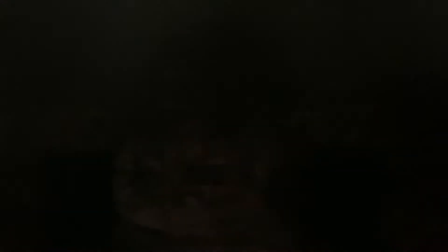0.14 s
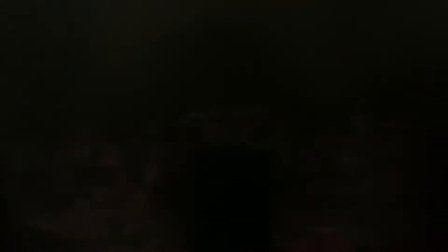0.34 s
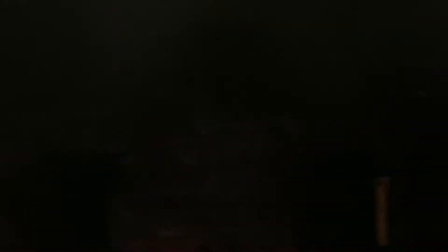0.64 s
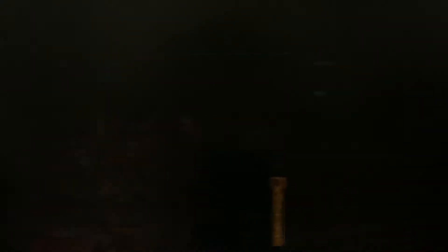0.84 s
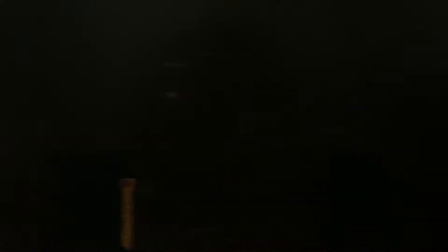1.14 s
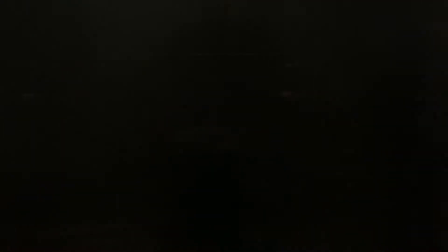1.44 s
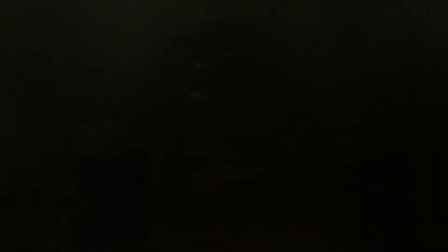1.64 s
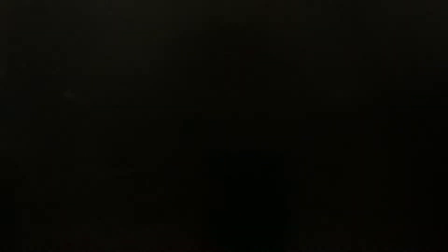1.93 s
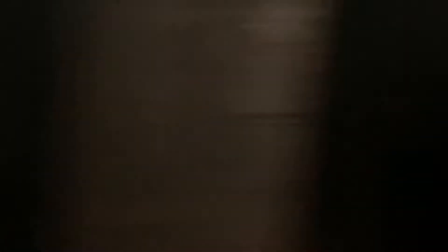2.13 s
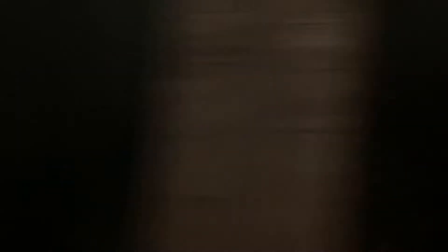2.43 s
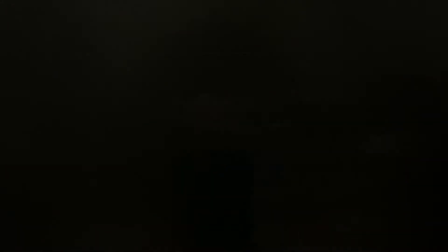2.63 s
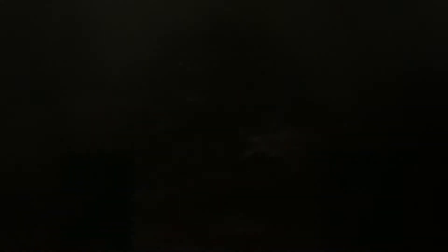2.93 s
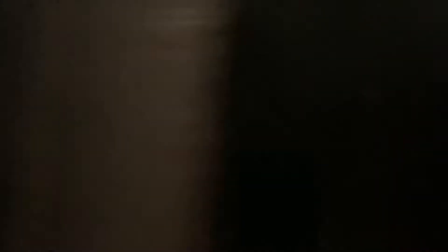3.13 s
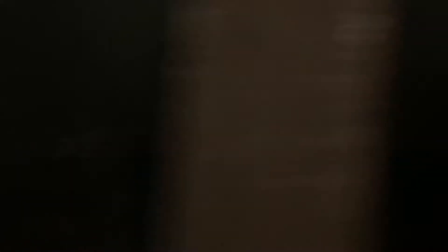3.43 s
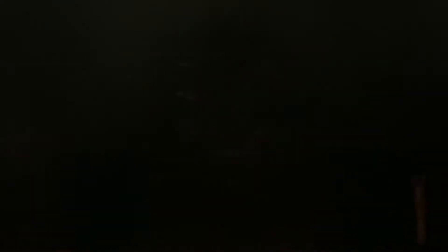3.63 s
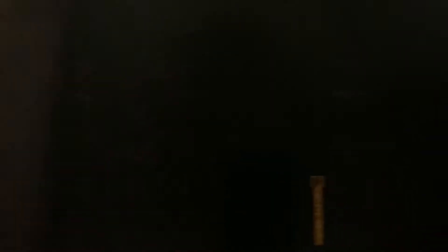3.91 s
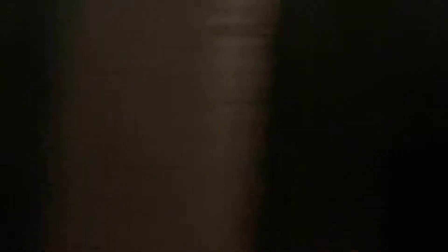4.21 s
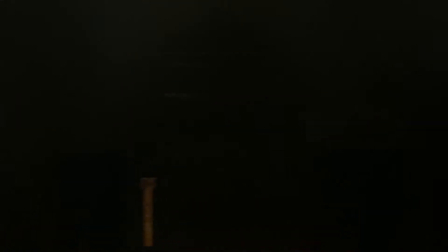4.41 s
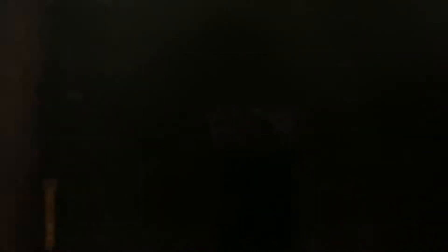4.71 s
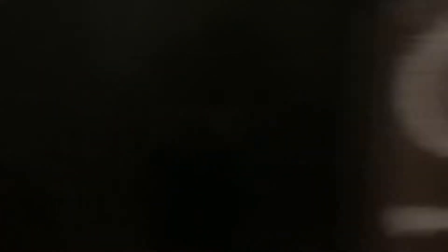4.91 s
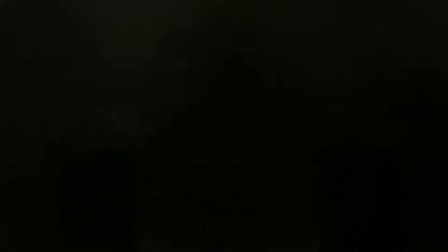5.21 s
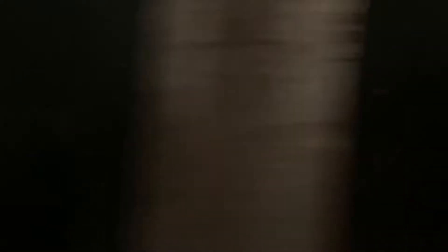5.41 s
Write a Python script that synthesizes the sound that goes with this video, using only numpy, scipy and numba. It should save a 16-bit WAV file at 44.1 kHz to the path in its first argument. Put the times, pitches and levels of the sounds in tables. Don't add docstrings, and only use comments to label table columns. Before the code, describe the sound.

Inside a subway car running fast through a tunnel, heavy wheel-and-rail roar fills the whole take, strongest in the lows, with irregular soft jolts and ringing body resonances. A thin metallic squeal near 2.7 kilohertz wavers in and out, mixed with fluttering air whistles. Panels hum low now and then. Near the end come a tiny tick and barely audible very high chirps. Close stereo pickup, wide, dense, with a short tunnel reverberation.

```python
import sys
import numpy as np
from scipy import signal
from scipy.fft import rfft, irfft
from scipy.io import wavfile
from scipy.ndimage import uniform_filter1d
from numba import njit

SR = 44100
rng = np.random.default_rng(int(sys.argv[2]) if len(sys.argv) > 2 else 0)


def put_to_file(sound):
    columns = np.atleast_2d(sound).T
    safe = np.clip(columns, -1, 1)
    whole_steps = np.round(safe * 32767)
    wavfile.write(sys.argv[1], SR, whole_steps.astype(np.int16))


def ratio_of_db(decibels):
    return 10 ** (np.asarray(decibels, float) / 20)


N = 244868
TIME = np.arange(N) / SR
FREQ = np.arange(N // 2 + 1) * SR / N + 1e-3

# [f/Hz, density/dB per Hz]
ROAR_MID = [(12, -46.5), (20, -17), (93, 0), (178, -4), (235, -1.5), (287, -6.5), (474, -5.5), (524, -11.5),
            (1330, -19.5), (2370, -20.5), (2820, -20), (3120, -24), (3630, -27), (8000, -55), (8500, -77),
            (10500, -108.5), (17800, -120)]
ROAR_SIDE = [(12, -48), (20, -26.5), (218, -7), (408, -4), (474, -4.5), (691, -9.5), (1030, -9),
             (1330, -14), (1470, -11), (2370, -15), (2820, -11), (4220, -28.5), (5560, -33.5), (8100, -53),
             (10500, -77.5), (17800, -120)]
ROAR_MID_DB, ROAR_SIDE_DB = -19.5, -25.5
# [f/Hz, left minus right level/dB]
LEFT_RIGHT_BALANCE = [(60, -2.5), (100, -1), (180, -0.5), (300, 0.5), (520, 1), (890, -0.5), (1520, 0.5),
                      (2600, 2.5), (4460, -0.5), (7650, -4.5)]
# [f/Hz, width/Hz, level over roar/dB]
BODY_RESONANCES = [(57.3, 7.9, 7.5), (72, 7.4, -7.5), (91, 7.1, 8), (114, 17, 5.5), (147.3, 13, 8),
                   (230, 13, 8), (252.8, 6.8, 8), (202.7, 15, 5), (338.2, 10, 8), (351, 9.9, 2),
                   (293, 23, 4.5), (439, 6.5, 5.5), (401.5, 8.5, 6), (486.6, 17, 7), (572, 37, 8.5),
                   (668, 23, 6), (921, 14, 7), (1460, 13, 7), (1160, 28, 4.5), (1710, 22, 3),
                   (1819, 31, 5.5), (2165, 20, 2), (2233, 13, 10), (2570, 32, 5.5)]
# [f/Hz, share]
PORT_LEAD = [(50, .6), (100, .35), (250, .33), (480, .27), (640, 0), (1050, -.17), (1500, -.22), (2100, 0),
             (3500, .15), (4500, 0)]

# [t/s, level/dB]
TRACK_ROUGHNESS = [(0, 3.5), (.5, 1.5), (1.2, 2), (1.8, 0.5), (2.2, 1.5), (2.7, 1), (3.2, 0.5), (4.0, 1.5),
                   (4.4, 2), (4.9, 1), (5.3, 1.5), (5.55, -1.5)]
SHAKE_EDGES_HZ = [80, 125, 190, 290, 430, 750, 1050]
# [share of track level, own sway level/dB]
SHAKE_FOLLOW = [(.5, 0.5), (.5, 0.5), (.5, 3), (.5, 1.5), (.5, 1.8), (.5, 1.26), (.3, 1)]
SHAKE_SWAYS_PER_S, WALL_SHARE, WALL_SWAY_DB = 14, 0.22, 0.77
KNOCK_DB, KNOCKS_PER_S, PATCHY_DB = 0.5, 8.1, 1
# [t/s, f/Hz, level/dB,
# length/s]
JOLTS = [(0.19, 100.0, 3, 0.03), (0.36, 50.0, 2, 0.078), (0.39, 100.0, 4.5, 0.04),
         (0.71, 50.0, 5.5, 0.064), (0.77, 50.0, -8, 0.03), (0.77, 100.0, 1.5, 0.057),
         (0.83, 50.0, 3.5, 0.04), (0.88, 100.0, -4, 0.018), (1.03, 50.0, 3.5, 0.1),
         (1.15, 100.0, 1, 0.06), (1.21, 50.0, -1.5, 0.03), (1.28, 50.0, 3, 0.11),
         (1.32, 100.0, 5, 0.027), (1.5, 50.0, -6, 0.029), (1.69, 50.0, -6.5, 0.024),
         (1.81, 50.0, -1.5, 0.056), (1.86, 100.0, -5.5, 0.048), (2.0, 100.0, -12.5, 0.05),
         (2.12, 50.0, 3, 0.11), (2.22, 50.0, 3.5, 0.03), (2.25, 100.0, -4.5, 0.033),
         (2.35, 100.0, 4, 0.12), (2.38, 50.0, 6, 0.04), (2.51, 100.0, -5.5, 0.036),
         (2.62, 50.0, -5, 0.018), (2.73, 50.0, -6.5, 0.04), (2.83, 100.0, -5.5, 0.024),
         (3.23, 100.0, -10.5, 0.064), (3.33, 50.0, -9.5, 0.08), (3.51, 100.0, -2.5, 0.05),
         (3.62, 100.0, 0.5, 0.023), (3.67, 50.0, -3.5, 0.036), (3.8, 100.0, -4, 0.025),
         (3.9, 50.0, -7.5, 0.027), (3.9, 100.0, -6.5, 0.04), (4.28, 100.0, 6.5, 0.029),
         (4.34, 100.0, -8, 0.045), (4.66, 100.0, 1.5, 0.09), (4.85, 100.0, 10, 0.029),
         (4.94, 50.0, -6, 0.037), (4.96, 100.0, -9.5, 0.13), (5.0, 50.0, 4, 0.044),
         (5.27, 50.0, -10.5, 0.027), (5.38, 100.0, 5, 0.093), (5.44, 50.0, -12, 0.04),
         (0.097, 150, -8, 0.082), (0.591, 150, 1, 0.03), (0.732, 150, 1, 0.093),
               (0.997, 150, 2, 0.12), (1.288, 150, -5, 0.065), (1.34, 150, 1.5, 0.052),
               (1.486, 150, -4, 0.033), (1.789, 150, -4.5, 0.05), (2.011, 150, -4, 0.036),
               (2.25, 150, 3, 0.04), (2.39, 150, -3.5, 0.12), (2.709, 150, -3, 0.033),
               (3.018, 150, -2.5, 0.046), (3.1, 150, -7.5, 0.04), (3.25, 150, 3, 0.088),
               (3.556, 150, 0, 0.033), (3.699, 150, -9, 0.031), (4.17, 150, -10, 0.036),
               (4.381, 150, 6.5, 0.03), (4.739, 150, -0.5, 0.022), (4.832, 150, -0.5, 0.079),
               (4.972, 150, 4.5, 0.067), (5.182, 150, 8.5, 0.029), (5.293, 150, 3, 0.02),
               (5.434, 150, -2.5, 0.02),
         (0.056, 230.0, 3.5, 0.03), (0.217, 230.0, -4, 0.03), (0.26, 230.0, 2.5, 0.07),
               (0.523, 230.0, 6.5, 0.024), (0.823, 230.0, -2.5, 0.058), (0.91, 230.0, 4, 0.054),
               (1.072, 230.0, -3.5, 0.092), (1.17, 230.0, 2.5, 0.12), (1.267, 230.0, 0.5, 0.084),
               (1.523, 230.0, 1, 0.036), (1.634, 230.0, 2, 0.02), (1.712, 230.0, 2, 0.03),
               (1.75, 230.0, -0.5, 0.028), (1.9, 230.0, 3, 0.04), (1.963, 230.0, -2.5, 0.04),
               (2.022, 230.0, 5, 0.046), (2.123, 230.0, 2.5, 0.065), (2.278, 230.0, -2.5, 0.05),
               (2.365, 230.0, 3.5, 0.06), (2.43, 230.0, -10, 0.022), (2.634, 230.0, -4, 0.023),
               (2.683, 230.0, 2.5, 0.027), (2.724, 230.0, -9.5, 0.018), (2.886, 230.0, -6.5, 0.018),
               (2.95, 230.0, -3, 0.035), (3.125, 230.0, -4, 0.026), (3.178, 230.0, 3.5, 0.1),
               (3.242, 230.0, -12.5, 0.02), (3.402, 230.0, 2.5, 0.09), (3.453, 230.0, -8, 0.018),
               (3.49, 230.0, 0.5, 0.026), (3.712, 230.0, 6.5, 0.04), (3.758, 230.0, -7, 0.024),
               (4.094, 230.0, -6.5, 0.03), (4.213, 230.0, 3.5, 0.15), (4.362, 230.0, -11, 0.019),
               (4.422, 230.0, 1.5, 0.12), (4.576, 230.0, -4, 0.04), (4.707, 230.0, -4, 0.03),
               (4.859, 230.0, -8.5, 0.026), (4.976, 230.0, -6, 0.02), (5.024, 230.0, 3.5, 0.067),
               (5.129, 230.0, -6, 0.025), (5.227, 230.0, -4, 0.03), (5.424, 230.0, -4.5, 0.045),
         (0.096, 890.0, -9.5, 0.03), (0.254, 890.0, 0, 0.03), (0.366, 350.0, 2, 0.1),
               (0.387, 570.0, 1.5, 0.04), (0.462, 570.0, -4.0, 0.023), (0.518, 890.0, 2, 0.16),
               (0.678, 570.0, 2, 0.063), (0.693, 350.0, 9, 0.03), (0.762, 350.0, -6.5, 0.087),
               (0.868, 350.0, 5, 0.036), (0.98, 890.0, -2, 0.11), (1.203, 890.0, 8.5, 0.018),
               (1.214, 350.0, 3, 0.041), (1.252, 570.0, -2.5, 0.16), (1.317, 890.0, 4.0, 0.033),
               (1.326, 570.0, 5, 0.032), (1.44, 350.0, 5, 0.035), (1.499, 890.0, -0.5, 0.025),
               (1.577, 570.0, 3.0, 0.036), (1.699, 350.0, 4.5, 0.028), (1.739, 890.0, 2, 0.11),
               (1.853, 570.0, 2, 0.11), (2.017, 350.0, -7.5, 0.04), (2.081, 890.0, 4.5, 0.082),
               (2.261, 890.0, 4, 0.028), (2.36, 350.0, 0, 0.032), (2.47, 570.0, 2, 0.05),
               (2.631, 890.0, 0, 0.05), (2.984, 350.0, 2.5, 0.071), (3.275, 350.0, 6.5, 0.036),
               (3.36, 570.0, 1.5, 0.053), (3.612, 890.0, 3, 0.049), (3.904, 890.0, 3, 0.019),
               (3.917, 570.0, 2, 0.15), (4.004, 890.0, 1.5, 0.045), (4.023, 570.0, -3, 0.068),
               (4.22, 890.0, 1.5, 0.024), (4.231, 570.0, 4, 0.021), (4.273, 350.0, -1, 0.07),
               (4.49, 570.0, 3, 0.021), (4.71, 350.0, -2.5, 0.05), (4.844, 890.0, 2, 0.074),
               (4.967, 350.0, -3, 0.033), (5.39, 350.0, 7, 0.03), (5.476, 570.0, 4.5, 0.13)]

# [t/s, slip rate f/Hz, level/dB]
FLANGE_SLIP = [(0, 928, -39), (.3, 920, -39), (.75, 907, -52), (1.2, 915, -42), (1.55, 912, -50),
               (2.1, 914, -39), (2.38, 912, -47), (2.6, 910, -37), (2.95, 901, -45), (3.4, 893, -47),
               (3.8, 882, -37), (3.95, 920, -40), (4.2, 927, -39), (4.45, 930, -50), (4.85, 934, -37),
               (5.05, 935, -38), (5.3, 900, -54), (5.45, 888, -43)]
# [multiple of slip rate, level/dB]
SQUEAL_HARMONICS = [(1, -5), (2, -12), (3, 0), (4, -11), (5, -19), (6, -22), (7, -38), (8, -40), (9, -36),
                    (10, -48)]
WOBBLE_PERCENT = 1.5
BITE_DB, BITE_DB_PER_HZ, BITE_DB_PER_DB = 8, -.17, -.2
SLOW_SLIP_HZ, SOFT_DB = 885, -47
TUNNEL_T60_S, TUNNEL_WET_DB = .2, 2

# [start t/s, end t/s, level/dB]
GUSTS_LOW = [
    (-.2, .35, -42),
    (.35, .75, -34),
    (2.75, 3.3, -39.5),
    (3.3, 3.84, -47.5),
    (3.95, 4.7, -41.5),
    (4.95, 5.3, -50),
    (5.4, 5.7, -36),
]
GUSTS_HIGH = [
    (-.2, .45, -36),
    (.72, .88, -37),
    (.86, 1.55, -35),
    (1.55, 2.37, -37.5),
    (2.41, 2.95, -34.5),
    (3.0, 3.65, -40),
    (3.93, 4.33, -37.5),
    (4.66, 5.15, -41),
]
# [start t/s, length/s, level/dB, centre f/Hz]
PUFFS_LOW = [(0.001, 0.061, -40, 2500), (0.124, 0.061, -37, 2610), (0.26, 0.093, -38.5, 2585),
             (0.373, 0.041, -35, 2600), (0.418, 0.087, -41, 2626), (0.504, 0.033, -37, 2490),
             (0.558, 0.031, -39, 2560), (0.643, 0.05, -37, 2490), (0.744, 0.043, -45, 2570),
             (1.132, 0.069, -38, 2640), (1.237, 0.031, -30.5, 2540), (1.623, 0.023, -42, 2650),
             (1.899, 0.051, -31, 2630), (2.178, 0.055, -36, 2620), (2.651, 0.1, -41, 2614),
             (2.873, 0.045, -38, 2540), (2.986, 0.052, -35, 2570), (3.095, 0.059, -36.5, 2550),
             (3.174, 0.059, -37, 2590), (3.254, 0.22, -37, 2585), (3.476, 0.097, -35.5, 2556),
             (3.591, 0.044, -33.5, 2584), (3.691, 0.15, -35, 2584), (3.938, 0.091, -37, 2570),
             (4.032, 0.029, -41, 2600), (4.105, 0.037, -36.5, 2570), (4.236, 0.039, -44, 2500),
             (4.336, 0.039, -36, 2570), (4.501, 0.049, -37, 2550), (4.605, 0.052, -35.5, 2596),
             (4.729, 0.055, -36, 2560), (4.872, 0.041, -39, 2610), (4.949, 0.051, -37, 2570),
             (5.085, 0.036, -35, 2570), (5.21, 0.057, -34.5, 2596), (5.493, 0.029, -41, 2570)]
PUFFS_HIGH = [(0.005, 0.03, -42, 2770), (0.05, 0.07, -36.5, 2774), (0.151, 0.03, -32, 2780),
              (0.195, 0.032, -38, 2850), (0.299, 0.025, -33, 2680), (0.39, 0.029, -38.5, 2760),
              (0.867, 0.053, -32, 2870), (0.968, 0.041, -34.5, 2870), (1.015, 0.2, -34, 2880),
              (1.217, 0.057, -37, 2820), (1.294, 0.038, -37.5, 2810), (1.326, 0.19, -32.5, 2860),
              (1.52, 0.24, -33.5, 2803), (1.772, 0.049, -30.5, 2824), (1.844, 0.055, -33, 2840),
              (1.954, 0.12, -30.5, 2824), (2.084, 0.071, -33.5, 2870), (2.163, 0.079, -33, 2810),
              (2.268, 0.05, -31, 2880), (2.331, 0.027, -27, 2820), (2.424, 0.14, -33, 2870),
              (2.645, 0.137, -34, 2780), (2.819, 0.037, -40, 2790), (3.327, 0.04, -36, 2740),
              (3.993, 0.037, -33, 2790), (4.064, 0.031, -40, 2780), (4.095, 0.041, -33, 2740),
              (4.22, 0.047, -32, 2760), (4.673, 0.087, -34, 2785), (4.797, 0.1, -31, 2817),
              (4.92, 0.07, -31.5, 2787), (5.041, 0.02, -33, 2780), (5.118, 0.026, -40, 2810)]
GUST_EDGE_S, GUST_DB = 0.11, -4.5
PUFF_EDGE_S, PUFF_DB = 0.02, -1
SLIT_LOW_WIDTH_HZ, SLIT_HIGH_WIDTH_HZ = 135, 135

# [start t/s, end t/s, level/dB]
HUMS = [
    (0.15, 0.5, -34.5),
    (1.15, 1.45, -33),
    (1.953, 2.25, -31),
    (3.3, 3.55, -34),
    (3.65, 4.5, -31.5),
]
HUM_HZ, HUM_WIDTH_HZ, HUM_EDGE_S = 228.3, 9.7, 0.1

# [start t/s, end t/s, level/dB]
CHIRPS = [
    (5.125, 5.27, -73),
    (5.365, 5.45, -73),
    (5.45, 5.535, -72),
]
CHIRP_HZ, CHIRP_WIDTH_HZ, CHIRP_SIDE_DB, CHIRP_EDGE_S = 13255, 240, 10, .03

# [t/s, peak level/dB]
TICKS = [
    (5.22, -61),
    (5.228, -61),
    (5.247, -45),
]

# [f/Hz, density/dB per Hz]
HISS_MID = [(8800, -41.5), (9700, -6), (10300, -3.5), (11000, -1), (11600, -6), (12700, -8.5),
            (13200, -14.5), (14000, -39.5)]
HISS_SIDE = [(7800, -21), (8400, 1.5), (9200, 2), (10200, -5.5), (10800, -36), (12000, -31.5),
             (12500, -11.5), (13400, -3.5), (14300, -10), (14800, -37)]
HISS_MID_DB, HISS_SIDE_DB = -81.5, -76


def roar(flicker_db=1.0, evened_share=0.72, beat_s=0.08):
    ring_power = 1
    for hz, width_hz, db in BODY_RESONANCES:
        ring_power = ring_power + (ratio_of_db(db) ** 2 - 1) / (1 + (2 * (FREQ - hz) / width_hz) ** 2)
    ring = np.sqrt(ring_power)

    mid_white, side_white = rfft(rng.standard_normal((2, N)))
    lead_hz, lead_share = np.transpose(PORT_LEAD)
    lead = np.interp(np.log(FREQ), np.log(lead_hz), lead_share)
    side_white = np.sqrt(1 - lead ** 2) * side_white + 1j * lead * mid_white
    mid = coloured(ROAR_MID, ROAR_MID_DB, ring, mid_white)
    side = coloured(ROAR_SIDE, ROAR_SIDE_DB, ring, side_white)
    spectra = rfft([mid, side])

    track_db = played(TRACK_ROUGHNESS)[0]
    middle_db = WALL_SHARE * track_db + WALL_SWAY_DB * sway(15)
    treble_db = WALL_SHARE * track_db + WALL_SWAY_DB * sway(15)
    track_db = track_db + KNOCK_DB * sway(KNOCKS_PER_S)

    sixth_octaves_hz = SHAKE_EDGES_HZ[-1] * 2 ** np.arange(1 / 6, 3.1, 1 / 6)
    edges_hz = [0, *SHAKE_EDGES_HZ, *sixth_octaves_hz, SR]
    ports = 0
    for k, (lo, hi) in enumerate(zip(edges_hz[:-1], edges_hz[1:])):
        mid, side = irfft(spectra * ((FREQ >= lo) & (FREQ < hi)), N)
        gain = ratio_of_db(flicker_db * sway(8))
        if k < len(SHAKE_FOLLOW):
            shake = level(ratio_of_db(shake_db(track_db, lo, hi, *SHAKE_FOLLOW[k])), 0)
            mid = steadied(mid, beat_s, evened_share) * shake / gain
        elif lo < 2500:
            gain = gain * ratio_of_db(middle_db)
        else:
            gain = gain * ratio_of_db(treble_db + PATCHY_DB * sway(12))
        ports = ports + gain * np.array([mid + side, mid - side])
    lean = np.sqrt(gain_at(LEFT_RIGHT_BALANCE))
    return irfft(rfft(ports) * np.array([lean, 1 / lean]), N)


def shake_db(track_db, lo, hi, share, sway_db):
    jolts_db = 0
    for s, hz, db, length_s in JOLTS:
        if lo <= hz < hi:
            jolts_db = jolts_db + db * np.exp(-((TIME - s) / length_s) ** 2)
    return share * track_db + sway_db * sway(SHAKE_SWAYS_PER_S) + jolts_db


def squeal(lean_db=2.5, rasp_db=3.5):
    hz, db = played(FLANGE_SLIP)
    bite_db = BITE_DB + BITE_DB_PER_HZ * (hz - SLOW_SLIP_HZ) + BITE_DB_PER_DB * (db - SOFT_DB)
    trembling_hz = hz * (1 + WOBBLE_PERCENT / 100 * walk(120))
    phase = 2 * np.pi * np.cumsum(trembling_hz) / SR
    stack = 0
    for order, order_db in SQUEAL_HARMONICS:
        part = ratio_of_db(order_db + rasp_db * walk(50)) * np.sin(order * phase)
        stack = stack + (part if order <= 3 else ratio_of_db(bite_db) * part)
    return tunnel(stack * ratio_of_db(db)) * lean_gain(lean_db)


def tunnel(x):
    t = np.arange(SR // 2) / SR
    tail = rng.standard_normal((2, len(t))) * np.exp(-np.log(1000) * t / TUNNEL_T60_S)
    tail *= ratio_of_db(TUNNEL_WET_DB) / np.sqrt(np.sum(tail ** 2, axis=1, keepdims=True))
    wet = signal.fftconvolve(x[None], tail, axes=1)[:, :N]
    return (x + wet) / np.sqrt(1 + ratio_of_db(TUNNEL_WET_DB) ** 2)


def whistle(gusts, puffs, width_hz, lean_db=4.0, flutter_db=0.83, waver=0.0069, steady=0.25, side_db=-0.5):
    start, length, _, centre_hz = np.transpose(puffs)
    hz = np.interp(TIME, start + length / 2, centre_hz) * (1 + waver * sway(16))
    mid, side = resonance(hz, width_hz), resonance(hz, width_hz)
    mid = level(steadied(mid, 0.014, steady), 0)
    side = level(side, side_db)
    gust = sum(ratio_of_db(db + GUST_DB) * held(s, e, GUST_EDGE_S) for s, e, db in gusts)
    puff = sum(ratio_of_db(db + PUFF_DB) * held(s, s + d, PUFF_EDGE_S) for s, d, db, _ in puffs)
    mid = mid * np.hypot(gust, puff)
    side = side * np.hypot(gust * ratio_of_db(0.5), puff * ratio_of_db(-1.5))
    return np.array([mid + side, mid - side]) * ratio_of_db(flutter_db * walk(32)) * lean_gain(lean_db)


def hum(drift=0.0092):
    hz = HUM_HZ * (1 + drift * walk(3.3))
    tone = level(steadied(resonance(hz, HUM_WIDTH_HZ), 0.046, 0.6), 0)
    return tone * sum(ratio_of_db(db) * held(s, e, HUM_EDGE_S) for s, e, db in HUMS)


def chirp():
    hz = np.full(N, float(CHIRP_HZ))
    mid = level(resonance(hz, CHIRP_WIDTH_HZ), 0)
    side = level(resonance(hz, CHIRP_WIDTH_HZ), CHIRP_SIDE_DB)
    envelope = sum(ratio_of_db(db) * held(s, e, CHIRP_EDGE_S) for s, e, db in CHIRPS)
    return np.array([mid + side, mid - side]) * envelope


def ticks(decay_s=.0007):
    burst = 0
    for s, db in TICKS:
        burst = burst + ratio_of_db(db) * (TIME >= s) * np.exp(-np.maximum(TIME - s, 0) / decay_s)
    common, left, right = rng.standard_normal((3, N))
    return (common + np.array([left, right]) / 2) * burst


def hiss(patchy_db=2.0):
    mid = coloured(HISS_MID, HISS_MID_DB)
    side = coloured(HISS_SIDE, HISS_SIDE_DB)
    return np.array([mid + side, mid - side]) * ratio_of_db(patchy_db * walk(13))


def level(x, db):
    return x * ratio_of_db(db) / np.sqrt(np.mean(x ** 2))


def lean_gain(db):
    return ratio_of_db(np.array([[db], [-db]]) / 2)


def played(table):
    s, *columns = np.transpose(table)
    return [np.interp(TIME, s, c) for c in columns]


def gain_at(table):
    hz, db = np.transpose(table)
    return ratio_of_db(np.interp(np.log(FREQ), np.log(hz), db))


def coloured(colour, db, ring=1, white=None):
    if white is None:
        white = rfft(rng.standard_normal(N))
    return level(irfft(white * gain_at(colour) * ring, N), db)


def walk(rate):
    k = int(SR / rate)
    steps = np.repeat(rng.standard_normal(N // k + 1), k)
    return 1.3 * uniform_filter1d(uniform_filter1d(steps, k), k)[:N]


def sway(rate, span=4):
    x = walk(rate)
    return x - uniform_filter1d(x, int(span * SR / rate))


def held(start, end, edge):
    ramp = np.minimum(TIME - start, end - TIME) / edge + .5
    return np.sin(np.pi / 2 * np.clip(ramp, 0, 1)) ** 2


def steadied(x, span_s, share):
    power = uniform_filter1d(x ** 2, int(span_s * SR)) / np.mean(x ** 2)
    return x / (power + 1e-3) ** (share / 2)


def resonance(hz, width_hz):
    width = np.full(N, float(width_hz))
    return svf(svf(rng.standard_normal(N), hz, width), hz, width)


@njit
def svf(x, hz, width):
    y, band, low = np.empty(len(x)), 0., 0.
    for i in range(len(x)):
        g = np.tan(np.pi * hz[i] / SR)
        k = width[i] / hz[i]
        v = (band + g * (x[i] - low)) / (1 + g * (g + k))
        band = 2 * v - band
        low = low + 2 * g * v
        y[i] = k * v
    return y


def scene():
    whistle_low = whistle(GUSTS_LOW, PUFFS_LOW, SLIT_LOW_WIDTH_HZ)
    whistle_high = whistle(GUSTS_HIGH, PUFFS_HIGH, SLIT_HIGH_WIDTH_HZ)
    return roar() + squeal() + whistle_low + whistle_high + hum() + chirp() + ticks() + hiss()


def low_pass(x):
    return signal.sosfilt(signal.butter(12, 14500, fs=SR, output="sos"), x)


def record(dry):
    mix = dry * held(.002, N / SR - .002, .004)
    return low_pass(mix)


dry = scene()
out = record(dry)
put_to_file(out)
```